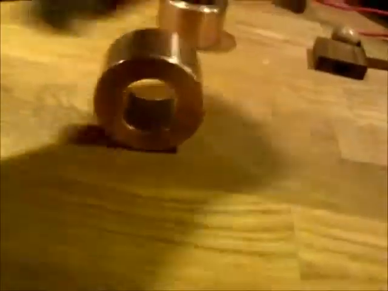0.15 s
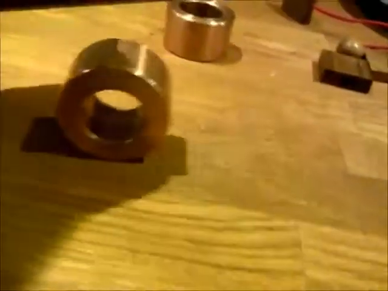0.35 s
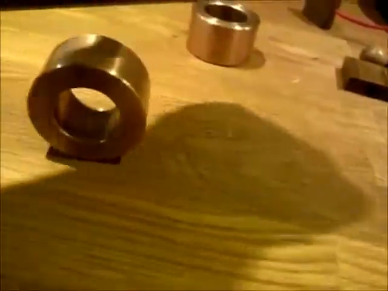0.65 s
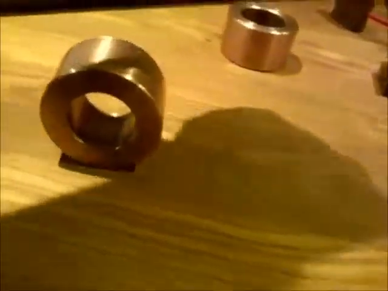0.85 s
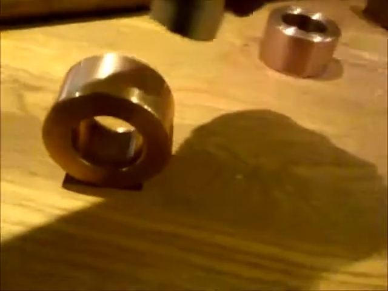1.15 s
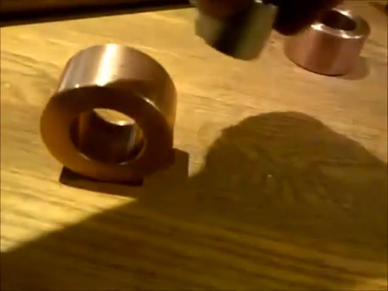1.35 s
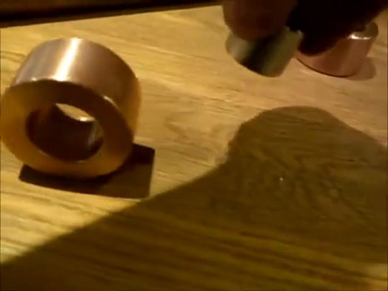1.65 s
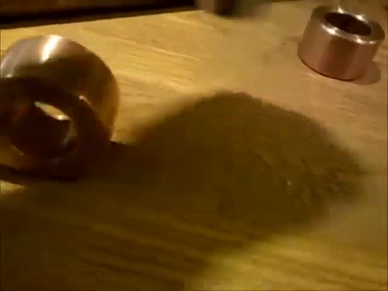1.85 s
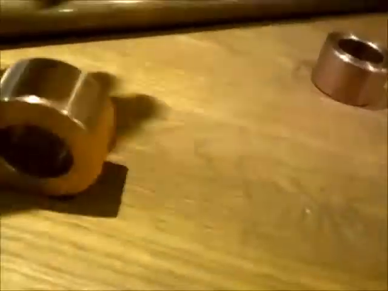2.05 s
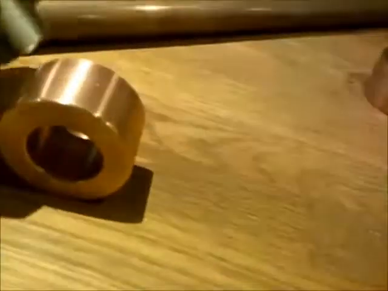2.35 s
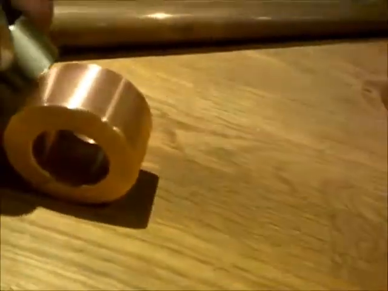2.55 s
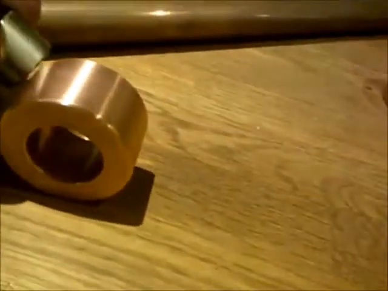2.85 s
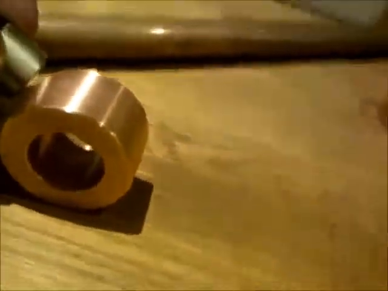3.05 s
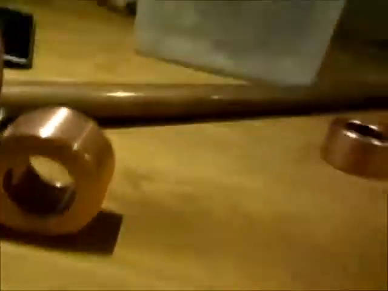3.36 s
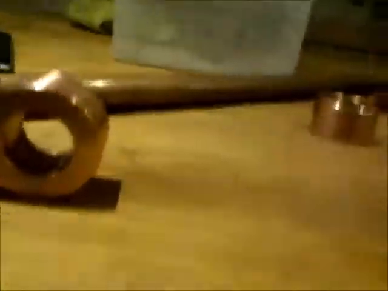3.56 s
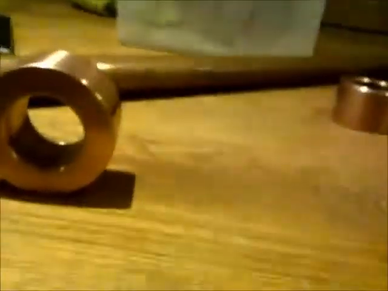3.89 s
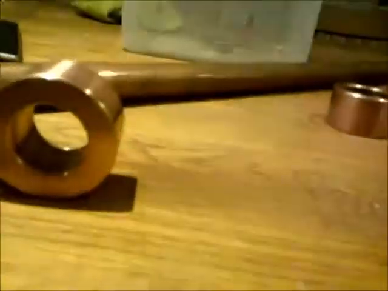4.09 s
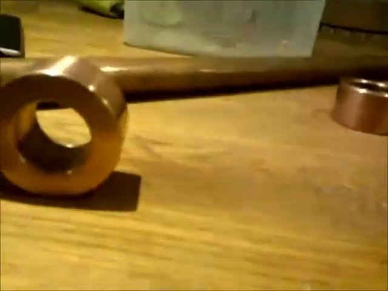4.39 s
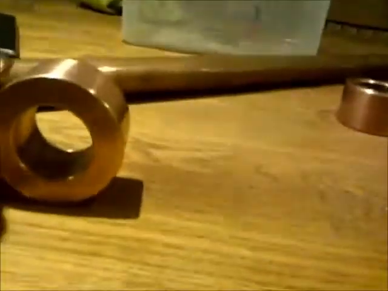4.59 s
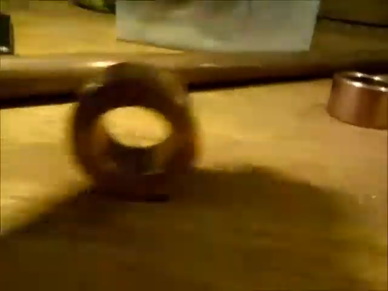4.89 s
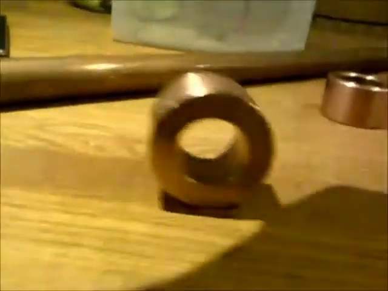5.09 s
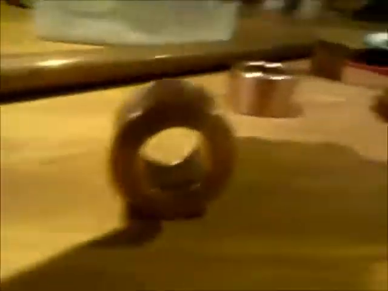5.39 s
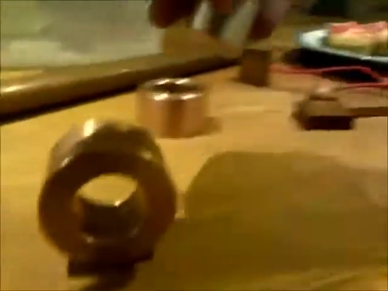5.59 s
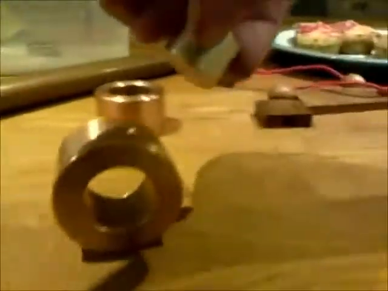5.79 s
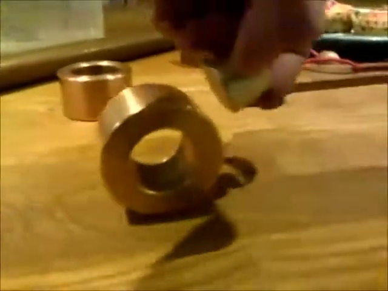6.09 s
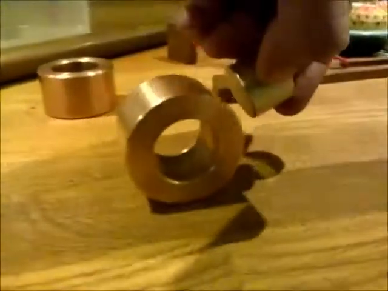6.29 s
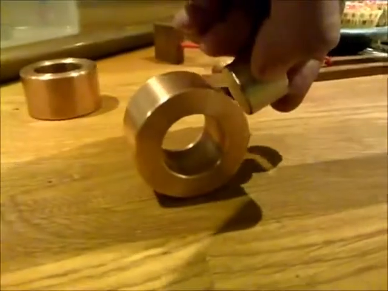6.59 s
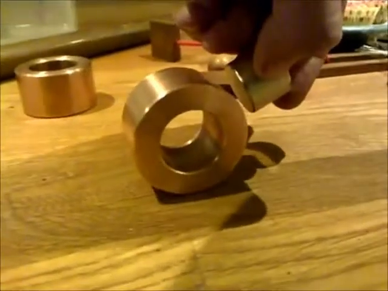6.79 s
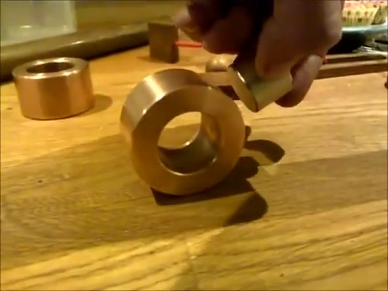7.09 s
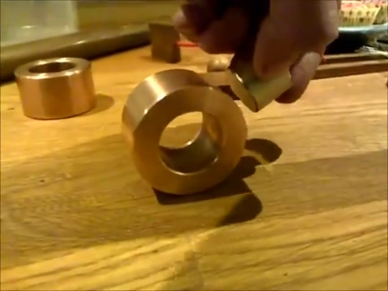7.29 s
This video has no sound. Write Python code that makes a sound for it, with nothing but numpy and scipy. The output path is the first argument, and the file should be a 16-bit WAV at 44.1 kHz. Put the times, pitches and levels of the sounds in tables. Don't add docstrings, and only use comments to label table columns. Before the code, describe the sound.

A heavy copper ring rolls and knocks woodenly on a table, with a bright metallic magnet click before a busy clatter, over steady hiss.

```python
import sys
import numpy as np
from scipy import signal
from scipy.fft import rfft, irfft, next_fast_len
from scipy.io import wavfile
from scipy.ndimage import uniform_filter1d

SR = 44100
rng = np.random.default_rng(int(sys.argv[2]) if len(sys.argv) > 2 else 0)


def volts(x):
    e = np.asarray(x, float) / 20
    return 10 ** e


def inscribe(sig):
    pcm = np.round(np.clip(np.atleast_2d(sig).T, -1, 1) * 32767)
    wavfile.write(sys.argv[1], SR, pcm.astype(np.int16))


N = 328306


def unit(x):
    return x / np.sqrt(np.mean(x ** 2) + 1e-20)


def along(points, hz):
    f, value = np.transpose(points)
    return np.interp(np.log(hz + 1), np.log(f + 1), value)


def filtered(x, response):
    m = next_fast_len(len(x) + 8192)
    hz = np.fft.rfftfreq(m, 1 / SR)
    return irfft(rfft(x, m) * response(hz), m)[:len(x)]


def add(track, sound, s):
    spot = track[round(s * SR):][:len(sound)]
    spot += sound[:len(spot)]


def body(modes, f, gains_db=0):
    gains = volts(gains_db) * (-1.) ** np.arange(len(modes))
    total = 0
    for gain, (centre, width, db) in zip(gains, modes):
        damping = 1j * f * width
        total = total + gain * volts(db) * damping / (centre * centre - f * f + damping)
    return total


# f/Hz, level/dB (per Hz)
HISS_SPECTRUM = [(12, -46.5), (20, -27.5), (49, -22), (69, -21.5), (165, -17.5), (217, -7), (324, 0.5),
                 (415, 0), (506, -1.5), (3110, -8.5), (7600, -12), (9880, -42), (16700, -120)]


def hiss():
    z = signal.stft(rng.standard_normal(N + 512), nperseg=512)[2]
    patches = uniform_filter1d(rng.standard_normal(z.shape), 8, 0)
    patches = uniform_filter1d(patches, 12, 1)
    noise = signal.istft(z * volts(0.94 * unit(patches)), nperseg=512)[1][:N]
    flat_top = [point for point in HISS_SPECTRUM if point[0] < 7000]
    return volts(-55) * unit(filtered(noise, lambda f: volts(along(flat_top, f))))


# t/s, level/dB
ROLLS = [
    [(0.0, -83), (0.27, -53.5), (0.49, -40.5), (0.64, -71)],
    [(0.64, -67), (0.91, -60), (1.88, -60), (2.4, -57.5)],
    [(4.8, -60), (4.93, -32), (5.186, -43.5), (5.89, -42.5), (6.128, -49.5), (6.6, -63)],
]
# f/Hz, width/Hz, level/dB
TABLE_MODES = [(189, 28, -10), (255, 41, -4), (345.5, 38, -1.5), (391.5, 24.4, -0.5), (459, 43.6, 3.5),
               (571, 31, -8.5), (614, 79, -2.5), (777, 123, 1), (830, 210, -6.5), (904.5, 68, 1.5),
               (1145, 68, -9), (1324, 66, -17), (1694, 190, -19), (2180, 630, -22), (3040, 800, -23)]


def rolling():
    bumps_per_s, softening_hz = 300, 350
    bumps = (rng.random(N) < bumps_per_s / SR) * rng.standard_normal(N)
    bumps = bumps * volts(2 * rng.standard_normal(N))
    modes = TABLE_MODES + [(434.7, 20.7, 12.5), (189, 120, -9)]
    rumble = filtered(bumps, lambda f: body(modes, f) / (1 + 1j * f / softening_hz) ** 2)
    t = np.arange(N) / SR
    level = 0
    for roll in ROLLS:
        level = level + volts(np.interp(t, *np.transpose(roll), left=-120, right=-120))
    return volts(-13) * level * unit(rumble)


# t/s (delay), level/dB
WALLS = [(.0044, -5), (.0065, -3), (.019, -15), (.031, -14)]
# f/Hz, t60/s
ROOM_DECAY = [(200, 0.31), (500, 0.43), (1200, 0.28), (5000, 0.17)]


def in_room(x, wet_db, walls=WALLS):
    hz, t, z = signal.stft(rng.standard_normal(len(x)), SR, nperseg=256)
    decay = volts(-60 * t / along(ROOM_DECAY, hz)[:, None])
    tail = signal.istft(z * decay, SR, nperseg=256)[1][:len(x)]
    tail = tail * np.clip(np.arange(len(tail)) / (0.015 * SR), 0, 1) ** 2
    answer = volts(wet_db) * tail / np.linalg.norm(tail)
    for s, db in [(0.00033, 0.04)] + walls:
        answer[round(s * SR)] += volts(db)
    return signal.fftconvolve(x, answer)[:len(x)]


# t/s, level/dB (peak), level/dB
KNOCKS = [(.378, -47, -11), (.411, -40, -6.5), (.5, -20, -8.5), (1.352, -47, -3.5), (1.802, -49, -3),
          (1.922, -49.5, 3), (2.085, -35.5, -8), (2.583, -32, -7.5), (4.743, -45.5, -22),
          (4.762, -25, -6.5), (4.862, -25.5, -3), (4.885, -27.5, -20), (4.899, -23.5, -15.5),
          (4.954, -24.5, -8), (5.0, -23.5, -7), (5.192, -32, -10.5), (5.268, -41, -5), (5.417, -36.5, -6.5),
          (5.51, -42.5, -11), (5.58, -31, -10.5), (5.605, -36, -13), (5.629, -32, -19),
          (5.6565, -14.5, -10.5), (5.752, -39, -6), (5.895, -46.5, -5), (5.917, -40, -3.5),
          (6.18, -52.5, -11), (6.359, -30, -8)]
# f/Hz, width/Hz, level/dB
SLOW_MODES = [(380.7, 13, -1), (433, 5.3, -3.5), (490, 9.6, -14), (578.5, 16, -3.5), (619, 6.8, -2.5),
              (772, 15, -0.5), (907, 13, -7), (1040, 7.2, -15), (1303, 12, -12)]


def knocks():
    middling_db, magnet_harder_db = -30, 13
    contact_s, contact_law = 1.2 / 1000, -.2
    bass_db, bass_per_db = -1.2, -0.23
    spot_scatter_db, slow_scatter_db, slow_db = 3.2, 3, 14
    out, t = np.zeros(N), np.arange(SR // 2) / SR
    bass = np.transpose(TABLE_MODES)[0] < 520
    click_times = np.transpose(CLICKS)[0]
    for s, db, wet_db in KNOCKS:
        by_magnet = np.abs(click_times - s).min() < .006
        hard_db = db - middling_db + magnet_harder_db * by_magnet
        phase = t / (contact_s * volts(contact_law * hard_db))
        push = np.sin(np.pi * phase) ** 2 * (phase < 1)
        spot_db = rng.normal(0, spot_scatter_db, len(TABLE_MODES))
        spot_db = spot_db + (bass_db + bass_per_db * hard_db) * bass
        linger_db = rng.normal(0, slow_scatter_db, len(SLOW_MODES)) + wet_db + slow_db
        thud = filtered(push, lambda f: body(TABLE_MODES, f, spot_db))
        hum = filtered(push, lambda f: body(SLOW_MODES, f, linger_db))
        hum = hum * np.clip(t / 0.0047, 0, 1)
        knock = in_room(thud, wet_db - 0.5) + hum
        add(out, volts(db - 2.0) * knock / np.abs(thud).max(), s)
    return out


# t/s, level/dB (peak), tilt/dB per octave, t/s (table bounce delay), level/dB (room share)
CLICKS = [
    (2.5809, -27.5, -2.5, .0038, -17.5),
    (3.3844, -44, -3.5, .0018, -25),
    (4.0026, -43, -2, 0.0025, -29.5),
    (4.7612, -12, 4, .003, -19),
    (5.256, -38.5, -3, .0025, -26),
]
# f/Hz, width/Hz, level/dB
METAL_MODES = [(1230, 41, -21), (2010, 340, 7), (3000, 3600, -38), (3970, 120, -4), (4860, 2080, 8.5),
               (7130, 1500, -1), (7330, 230, 9.5), (8860, 5600, 5.5), (10280, 840, 12.5)]


def clicks():
    out, t = np.zeros(N), np.arange(SR // 3) / SR
    for s, db, tilt_db, bounce_s, wet_db in CLICKS:
        chatter = rng.standard_normal(len(t)) * volts(-60 * t / .004) * .08
        chatter[[0, round(.0007 * SR)]] = 1, .45
        scatter = np.abs(t - .0048) < .0017
        chatter += rng.standard_normal(len(t)) * volts(-32) * scatter
        bright_db = tilt_db * np.log2(np.transpose(METAL_MODES)[0] / 5000)
        snap = filtered(chatter, lambda f: body(METAL_MODES, f, bright_db))
        bounces = [(bounce_s, -9.5), (.0215, wet_db - 17)]
        add(out, volts(db + 8) * in_room(snap / np.abs(snap).max(), wet_db, bounces), s)
    return out


# t/s, length/s, level/dB
RUSTLES = [
    (3.02, 0.25, -60),
    (3.6, 1, -65.5),
    (6.029, 0.085, -57.5),
]


def rustle():
    t = np.arange(N) / SR
    swell = 0
    for s, length, db in RUSTLES:
        rise = np.clip((t - s) / 0.013, 0, 1)
        fade = np.clip(1 - (t - s) / length, 0, 1)
        swell = swell + volts(db) * rise * fade
    return swell * unit(filtered(rng.standard_normal(N), lambda f: body(METAL_MODES[2:7], f)))


def scene():
    low_cut = signal.butter(8, 181, "high", fs=SR, output="sos")
    struck = signal.sosfilt(low_cut, knocks() + clicks() + rolling())
    return (struck + rustle() + hiss())[None]


def roll_off(x):
    return signal.sosfilt(signal.butter(12, 16500, fs=SR, output="sos"), x)


# f/Hz, level/dB
TREBLE_EDGE = [(7000, 2), (7650, -6), (8000, -13), (8300, -9.5), (9300, -17.5), (9900, -34), (11000, -63),
               (15500, -79)]


def record(dry):
    x = filtered(dry[0], lambda f: volts(along(TREBLE_EDGE, f)))
    x = x + .03 * x ** 2 - .03 * x ** 3
    x = x + volts(-96.0) * filtered(rng.standard_normal(N), lambda f: f < 15000)
    return roll_off(x[None])


dry = scene()
out = record(dry)
inscribe(out)
```